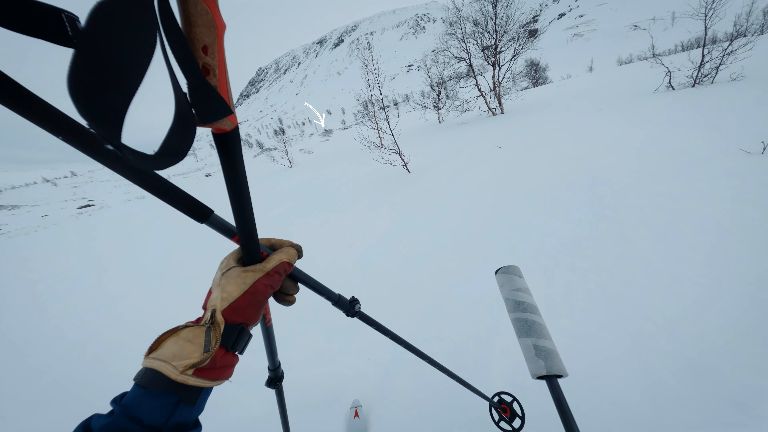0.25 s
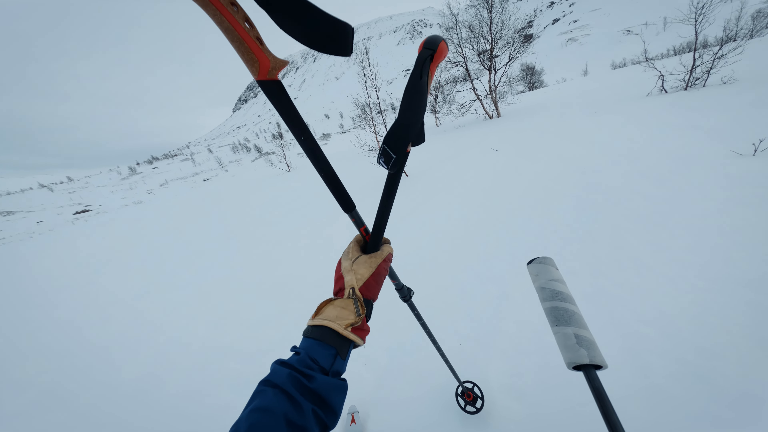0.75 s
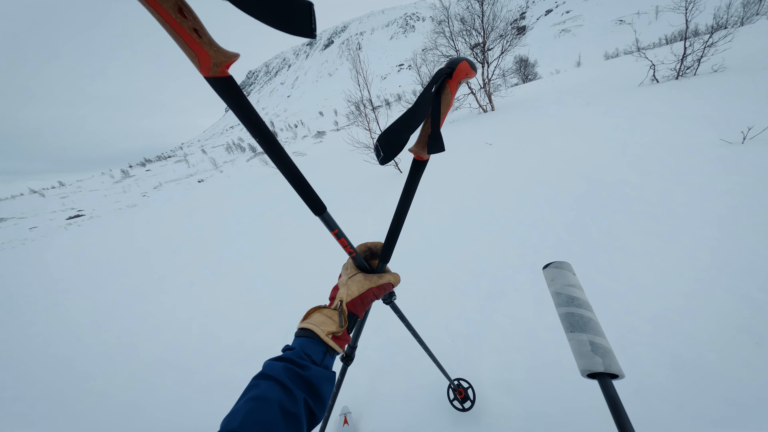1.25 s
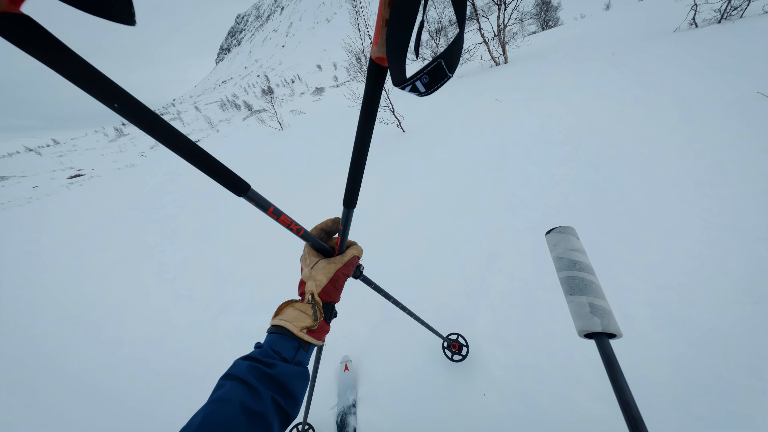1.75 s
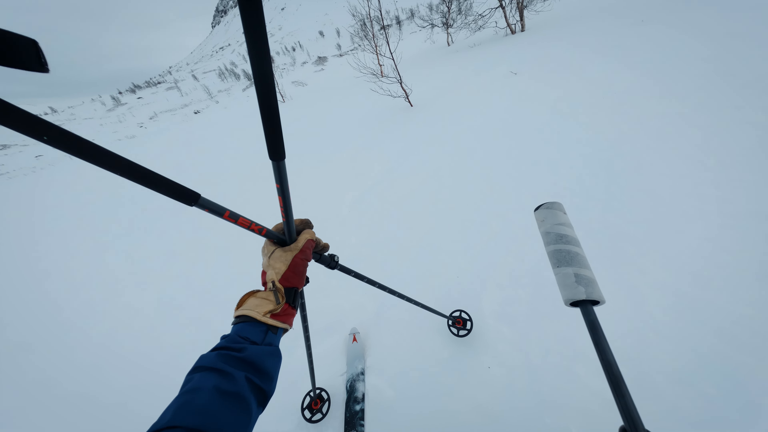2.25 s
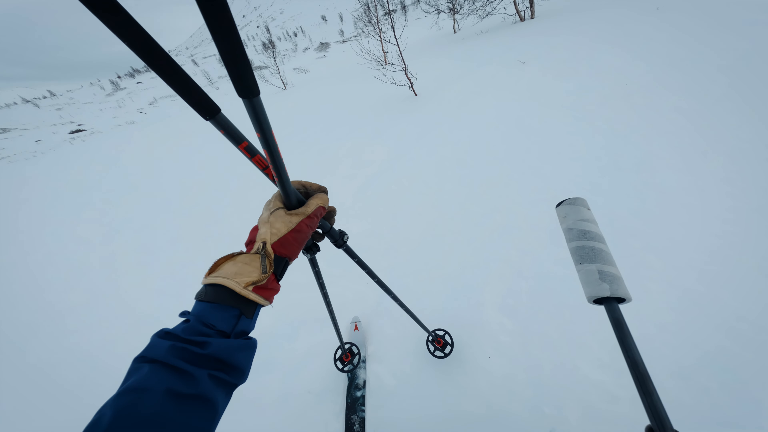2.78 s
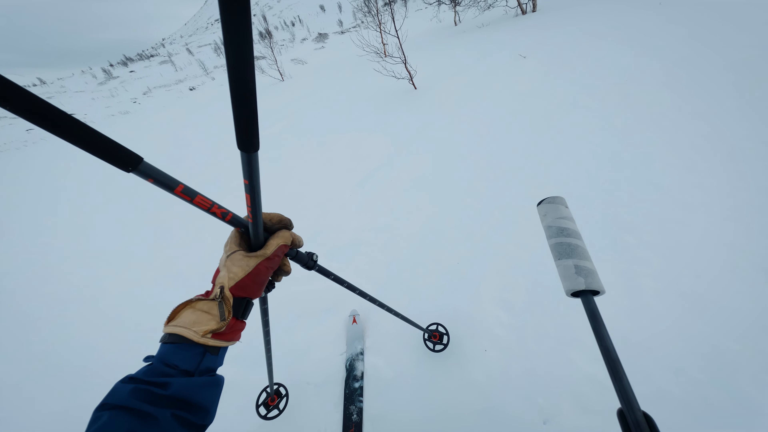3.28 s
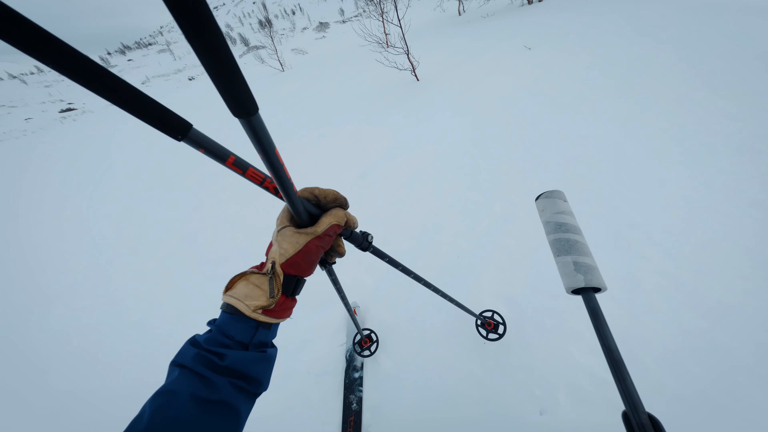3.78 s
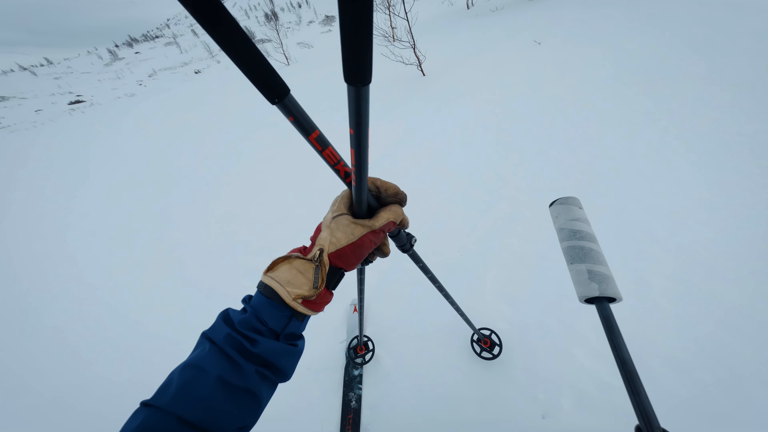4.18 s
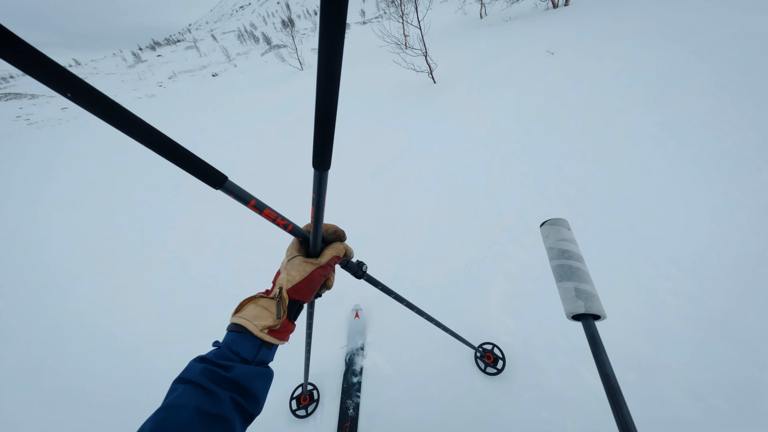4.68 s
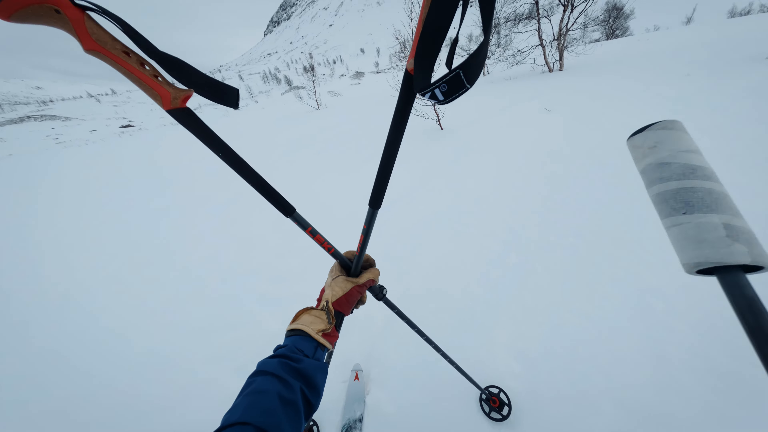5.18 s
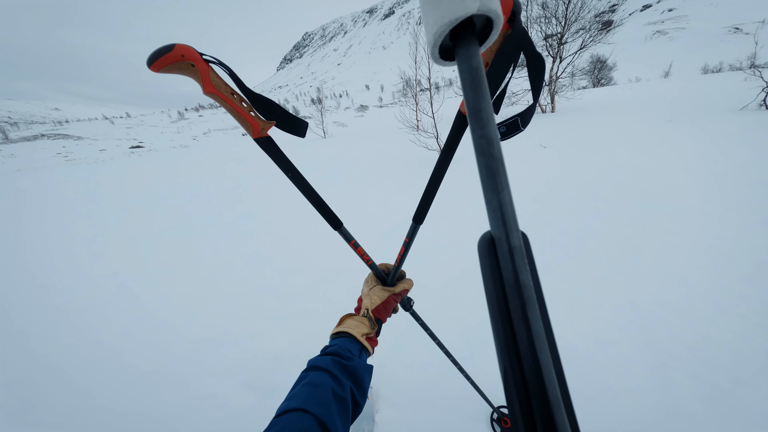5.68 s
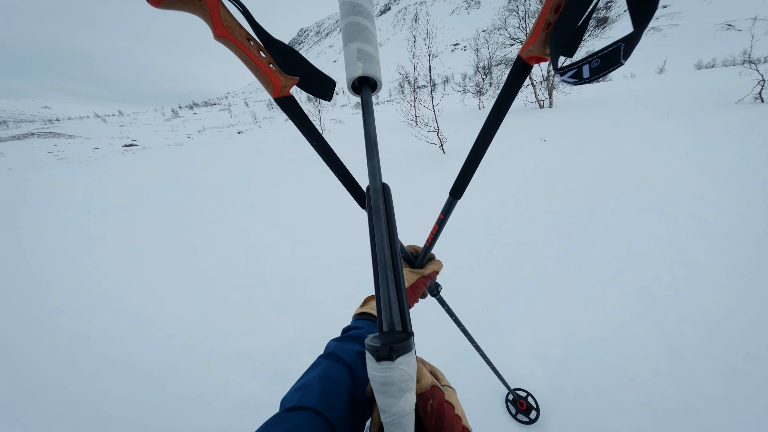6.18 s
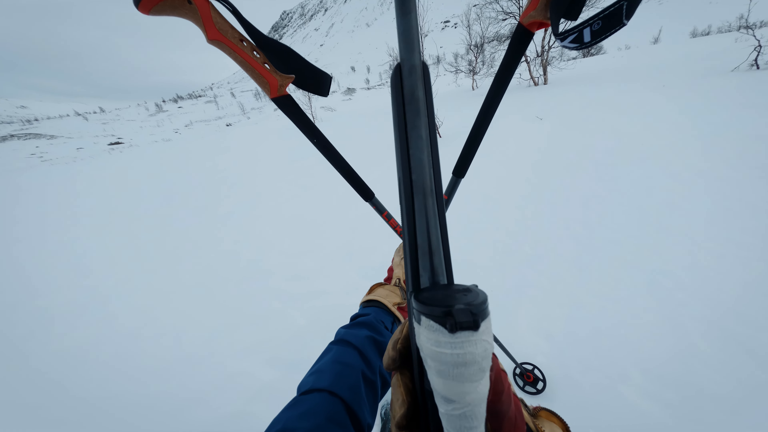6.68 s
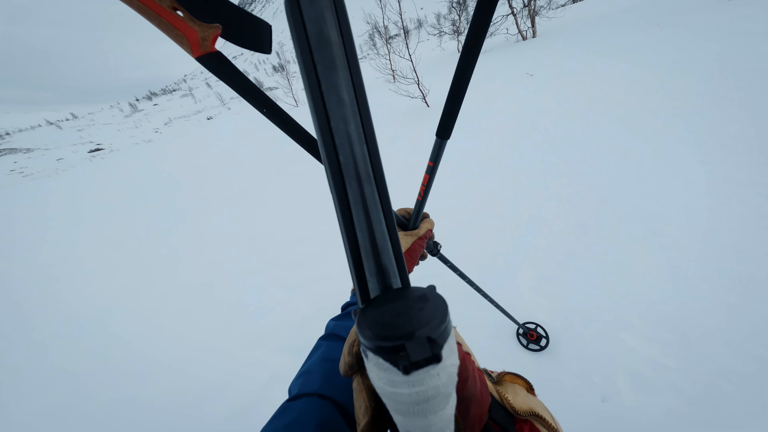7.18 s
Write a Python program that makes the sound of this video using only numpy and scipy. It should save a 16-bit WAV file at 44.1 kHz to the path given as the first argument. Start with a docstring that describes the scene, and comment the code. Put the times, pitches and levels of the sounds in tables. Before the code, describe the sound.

Open, echo-free snow, heard very close through a chest-worn stereo microphone. A short wind buffet opens, fading into low uneven rumble. At 0.2 s ski poles clack twice with brittle snaps; a louder, ringing clack lands at 0.7 s. Cloth rustles softly. Around 1.35 s a crack, a strap scrape and a short crunch, with soft pressure thumps to 1.55 s. From 1.95 to 2.6 s snaps crowd into gritty crunching runs. It quietens from about 3 s to 3.9 s, with only rustle and light wind. A strong crunch breaks at 4.0 s; scraping and crackling build from 4.45 s to a sharp pole clack and crunch at 4.77 s. Rustling swells at 5.2 s. From 5.5 to 6.3 s dull gear knocks, a brief creak and snaps cluster, with a hard tick at 6.03 s. Afterwards mostly faint cloth, tiny knocks, and a sudden crisp rustle at 7.3-7.4 s.

```python
"""Someone shifts about in hard crusted snow, handling ski poles close to chest-worn microphone ports.
From the start wind buffets (swinging low noise) and clothing rustles (clumpy noise, loose-snow ticks);
at 0.19 s poles clack (pushed resonances) and crust snaps (cracks with dying swarms), on to the end.
Gear knocks dully from 0.4 s (decaying tones), straps scrape from 1.33 s (noise through resonances),
crust gives way in runs from 1.34 s (dense cracks) and pressure thumps from 1.44 s (smooth pulses)."""
import sys
import numpy as np
from scipy import signal
from scipy.fft import rfft, irfft, next_fast_len
from scipy.io import wavfile
from scipy.ndimage import uniform_filter1d, map_coordinates

SR = 44100
rng = np.random.default_rng(int(sys.argv[2]) if len(sys.argv) > 2 else 0)


def wav_record(signal):
    """Record a signal, one row per channel, as 16-bit PCM in the file named by sys.argv[1]."""
    frames = np.transpose(np.atleast_2d(signal))
    bounded = np.clip(frames, -1, 1)
    # unit amplitude maps onto the largest positive 16-bit level
    quanta = np.round(bounded * 32767).astype(np.int16)
    wavfile.write(sys.argv[1], SR, quanta)


N = 327766
SIZE = next_fast_len(N + SR // 4)
HZ = np.fft.rfftfreq(SIZE, 1 / SR)

# colour of breaking crust: f/Hz, relative level/dB
CRUST_COLOUR = [(76, -60), (130, -3), (246, 1.5), (333, -2.5), (406, -1.5), (740, -4.5), (818, -2),
                (1350, -3.5), (1520, -2), (1860, -6.5), (5460, -9), (10200, -24), (13000, -40),
                (15400, -50)]
# colour of rubbed cloth: f/Hz, relative level/dB
CLOTH_COLOUR = [(65, -31), (110, 2.5), (257, 2.5), (440, 2), (509, -1), (1210, -1.5), (1490, -3.5),
                (1760, -3), (2450, -6.5), (3140, -7.5), (7650, -14.5), (12300, -28.5), (15400, -46)]
# pole tube resonances: f/Hz, width/Hz, gain re crust colour/dB
POLE_MODES = [(1252, 73, 3), (1713, 66, 8.5), (2270, 260, 4.5), (4280, 75, 7), (4500, 74, -9),
              (6440, 190, 8)]


def amp(db):
    """Gain of a level in dB."""
    return 10 ** (np.asarray(db) / 20)


def unit(x):
    """x at rms 1."""
    return x / np.sqrt(np.mean(x ** 2) + 1e-20)


def along(points, hz):
    """Interpolate (f/Hz, value) points on a log axis."""
    f, v = np.transpose(points)
    return np.interp(np.log(hz + 1), np.log(f + 1), v)


def curves(rows, outside=None):
    """One value per sample for each column after the time."""
    s, *cols = np.transpose(rows)
    return [np.interp(np.arange(N) / SR, s, c, outside, outside) for c in cols]


def wobble(knots_per_s):
    """A smooth random curve through random knots."""
    knots = rng.standard_normal(int(N * knots_per_s / SR) + 4)
    return map_coordinates(knots, [np.arange(N) * knots_per_s / SR])


def grainy(grain_db, rate, patchy_db, count=5):
    """Two unrelated noises sharing a fast, spiky loudness and patches of colour, count frames long."""
    z = signal.stft(rng.standard_normal((2, N)), nperseg=512)[2]
    field = uniform_filter1d(rng.standard_normal(z.shape[1:]), size=4, axis=0)
    field = uniform_filter1d(field, size=count, axis=1)
    pair = signal.istft(z * amp(patchy_db * unit(field)), nperseg=512)[1][:, :N]
    return unit(amp(grain_db * wobble(rate)) * pair)


def modes(table):
    """Causal response of a set of resonances, alternating in sign."""
    response = 0
    for k, (hz, width_hz, db) in enumerate(table):
        damping = 1j * HZ * width_hz
        response = response + (-1) ** k * amp(db) * damping / (hz * hz - HZ * HZ + damping)
    return response


def coloured(pair, gain):
    """Spectra of two noises coloured by gain, at unchanged level."""
    return rfft(pair, SIZE) * (gain / np.sqrt(np.mean(np.abs(gain) ** 2)))


def stereo(spectra):
    """Two unrelated spectra mixed to the likeness of the ports."""
    # left-right likeness: f/Hz, correlation
    likeness = [(30, 0.81), (100, 0.84), (300, 0.96), (2000, 0.86), (8000, 0.87), (13000, 0.51)]
    turn = np.arccos(np.clip(along(likeness, HZ), -1, 1)) / 2
    mid, side = spectra * [np.cos(turn), np.sin(turn)]
    return irfft(np.array([mid + side, mid - side]), SIZE)[:, :N]


def banded(pair, gain, body, bass, treble):
    """A coloured noise whose body, bass and treble follow their own envelopes."""
    low = 1 / (1 + (HZ / 980) ** 8)
    high = 1 - 1 / (1 + (HZ / 4000) ** 8)
    mid = np.clip(1 - low - high, 0, 1)
    bands = zip([body, bass, treble], [mid, low, high])
    return stereo(sum(coloured(pair * level, gain * share) for level, share in bands))


def wind():
    """Pressure swings on the ports: a deep rumble and a faster flutter above it, both lumpy noise."""
    # wind on the ports: t/s, rumble level/dB, flutter level/dB
    gusts = [(0.0, -35, -26), (0.1, -58.5, -55.5), (0.58, -51.5, -63.5), (0.89, -61.5, -61.5),
             (1.06, -40.5, -48), (1.32, -56, -63.5), (1.53, -43.5, -43.5), (1.68, -50.5, -61),
             (1.76, -33.5, -51), (1.88, -55, -55), (2.15, -46, -58), (2.52, -53.5, -70), (2.77, -44.5, -69),
             (2.9, -54.5, -91), (3.41, -49, -71.5), (3.6, -67, -71), (3.68, -43, -57), (3.77, -65, -72),
             (3.83, -41, -57.5), (4.22, -39, -61), (4.28, -45, -63), (4.35, -44, -51), (4.57, -39, -40),
             (4.7, -49, -76), (4.95, -59, -81), (5.13, -49.5, -65), (5.5, -55.5, -64), (6.25, -63, -69),
             (6.41, -52, -79), (6.5, -60.5, -63.5), (7.1, -50, -65), (7.43, -62, -56.5)]
    # colour of the wind: f/Hz, relative level/dB
    gust_colour = [(8.8, -21), (15, 7.5), (42, -2.5), (108, -21), (200, -18), (260, -38.5), (440, -120)]
    colour = amp(along(gust_colour, HZ))
    deep = 1 / (1 + (HZ / 60) ** 6)
    upper = (1 - deep) / (1 + (HZ / 115) ** 4)
    rumble, flutter = amp(curves(gusts))
    rumble = rumble * amp(5 * wobble(14)) * rng.standard_normal((2, N))
    flutter = flutter * amp(6 * wobble(28)) * rng.standard_normal((2, N))
    return stereo(coloured(rumble, colour * deep) + coloured(flutter, colour * upper))


def rustle():
    """Cloth folds creak in clumps over a soft hiss; each move swells and fades."""
    # clothing and loose snow: t/s, body level/dB, bass level/dB, treble level/dB
    bed = [(0, -56, -57, -69), (.37, -66, -81, -64.5), (.66, -57, -66.5, -61), (.84, -62, -59.5, -65.5),
           (1.22, -55.5, -62.5, -60.5), (1.58, -61.5, -76, -59.5), (1.81, -62, -67, -78),
           (2.36, -64, -64.5, -64), (2.77, -59.5, -62.5, -64.5), (3.25, -62, -65, -67.5),
           (3.55, -59.5, -74, -65), (3.58, -71.5, -87, -72), (3.752, -74, -90, -70.5),
           (3.76, -57, -63, -65), (3.85, -64, -73, -72), (3.96, -63, -69, -65), (4.57, -66, -70, -80),
           (4.94, -56.5, -63, -75), (5.45, -62, -64, -66.5), (6.56, -58.5, -64.5, -62.5),
           (6.66, -64, -72, -63), (6.97, -62, -66, -66.5), (7.325, -66, -67, -67.5),
           (7.372, -49.5, -53, -48.5), (7.43, -48.5, -60, -51)]
    # moves: peak t/s, 10 dB rise/s, 10 dB fall/s (both min 4 ms), body/dB, bass/dB, treble/dB
    moves = [(.24, 0, 0.02, -57, -51.5, -60.5), (.68, 0.1, 0.13, -62, -70, -59.5),
             (1.02, 0.14, 0.23, -57, -53.5, -63), (1.44, 0.24, 0.06, -72, -63, -59),
             (1.96, 0.1256, 0.11, -46, -52.5, -62), (2.212, 0.24, 0, -49.5, -72, -46),
             (2.5, 0.21, 0.2, -75.5, -56, -77), (2.66, 0.13, 0.1, -55.5, -56, -75),
             (2.836, -0.18, 0.01, -50, -54, -52), (3.19, .15, -0.04, -61, -76, -57),
             (3.432, 0.4, 0.13, -72, -62.5, -87), (3.815, 0.04, 0, -59, -57.5, -70),
             (4.092, 0.0443, 0.05, -49, -47.5, -61), (4.45, 0.11, 0.08, -52.5, -56, -57),
             (4.66, 0.01, 0.18, -51, -59, -45.5), (4.79, 0.04, 0.055, -38, -69, -42.5),
             (5.211, 0.2, 0.14, -44.5, -48.5, -47), (5.68, 0.15, 0.34, -57.5, -53, -60),
             (5.94, 0.17, 0.28, -45.5, -52, -50), (6.27, 0.24, 0.06, -51, -51, -55),
             (6.54, 0, 0.3, -56, -68.5, -61.5), (6.871, 0.04, 0.06, -50.5, -50.5, -76),
             (7.15, 0.14, 0.33, -54, -53, -64.5), (7.282, 0, 0, -45.5, -45, -50)]
    ticks_per_s, mean_tick_gain, tick_decay_s = 25, 0.61, 0.00079
    t = np.arange(N) / SR
    clumps = amp(1.65 * wobble(45))
    # loose grains of snow
    ticks = (rng.random(N) < ticks_per_s / SR) * rng.exponential(mean_tick_gain, size=N)
    clumps = clumps + signal.lfilter([1], [1, -np.exp(-1 / (tick_decay_s * SR))], ticks)
    power = amp(curves(bed)) ** 2
    for s, rise_s, fall_s, *db in moves:
        rise_s, fall_s = np.clip([rise_s, fall_s], 0.004, None)
        near = slice(max(round((s - 4 * rise_s) * SR), 0), round((s + 4 * fall_s) * SR))
        swell = amp(-10 * np.maximum((s - t[near]) / rise_s, (t[near] - s) / fall_s))
        power[:, near] += np.outer(amp(db), swell) ** 2
    noise = clumps * grainy(grain_db=1.5, rate=610, patchy_db=2.0)
    return banded(noise, amp(along(CLOTH_COLOUR, HZ)), *np.sqrt(power))


def clacks():
    """Poles clack together: a short push rings the tubes; the longer the contact, the duller."""
    # pole contacts: t/s, level/dB, contact time/ms
    contacts = [(0.1884, -5, .03), (0.2418, -1, 0.19), (0.7162, 7, 0.052), (4.7681, -1, .03)]
    pushes, t_ms = np.zeros((2, SIZE)), np.arange(SR // 200) / SR * 1000
    for s, db, contact_ms in contacts:
        push = np.exp(-t_ms / contact_ms)
        pushes[:, round(s * SR):][:, :len(t_ms)] = amp(db) * push / push.sum() * [[1], [.5]]
    return stereo(coloured(pushes, amp(along(CRUST_COLOUR, HZ)) * modes(POLE_MODES)))


def crunch():
    """Each snap is a hard crack, then a dying swarm of smaller ones; the treble dies first."""
    # crust snaps: t/s, level/dB, bass re body/dB, treble re body/dB, body t60/s
    snaps = [(0.189, -13.5, -6, 1.5, 0.03), (.217, -31, -13, -1, 0.041), (0.224, -28, 0, -3, 0.034),
             (0.2415, -25, -2, -24, 0.041), (0.2694, -38, -1, 0.5, 0.068), (.398, -37.5, -10, -0.5, 0.045),
             (0.7151, -12.5, -14.5, -3.5, 0.075), (1.046, -34, 1, -0.5, 0.041),
             (1.076, -29, -0.5, -4, 0.19), (1.2487, -35.5, -12, -2, .059), (1.2588, -29, -22.5, 0, 0.031),
             (1.3361, -16.5, -44, -7, 0.061), (1.353, -23, -27, -11, 0.047), (1.377, -28.5, -22, -5, 0.066),
             (1.554, -30.5, -2, -6.5, 0.093), (1.641, -41, -24, 6, 0.018), (1.753, -31.5, -8, -4, 0.03),
             (1.943, -27.5, -11.5, 1.5, 0.07), (1.9674, -19.5, -20, -19, .05), (1.9748, -21, -8, -17, 0.14),
             (1.995, -16, -11.5, -5, 0.057), (2.02, -22.5, -13, -8, 0.048), (2.244, -19, -33, -15, 0.036),
             (2.2717, -22, -13, 0, 0.084), (2.323, -33.5, -20, -3, 0.04), (2.369, -37, -27, -9, 0.07),
             (2.388, -29, -21, -7.5, 0.11), (2.4015, -23.5, -8.5, -7, 0.089),
             (2.4607, -21, -23, -4.5, 0.037), (2.527, -20, -27, 2, 0.032), (2.5504, -23, -3, -10, 0.076),
             (2.585, -16.5, -25, 1, 0.071), (2.949, -26.5, -16, -9.5, 0.032), (3.126, -36, -20, 3, 0.027),
             (3.7563, -28.5, -21, -7, 0.018), (3.9666, -21, -36, -6, 0.048), (3.9925, -11, -25, -2.5, 0.1),
             (4.008, -13, -15, -10, 0.091), (4.083, -26, -13, -15, 0.037),
             (4.1793, -28.5, -22.5, -4, 0.039), (4.2725, -29, -18, 4, 0.06), (4.41, -40.5, -2, 2.5, 0.088),
             (4.467, -20.5, -7.5, -23, 0.13), (4.669, -27, -27, -7, 0.041), (4.681, -37, -19, -10, 0.045),
             (4.698, -25.5, -23, 0.5, 0.057), (4.7682, -8, -15.5, -1.5, 0.045),
             (4.775, -14, -15, -12, 0.043), (4.842, -17, -29, 0, 0.039), (4.8726, -31, -29, -14, 0.028),
             (5.0311, -26.5, -8, -4, 0.032), (5.1249, -26.5, 3, -9, 0.047), (5.157, -28.5, -6, -1, 0.076),
             (5.206, -33, -21, -34, 0.043), (5.515, -36, 5, -20, 0.021), (5.5463, -28, -23, 0, 0.059),
             (5.641, -35.5, 7.5, -27, 0.052), (5.681, -36.5, 11.5, -30, 0.046),
             (5.7506, -21.5, -10, -4.5, 0.066), (5.7938, -18.5, 1.5, -8, 0.048),
             (5.8274, -16, -23, -4.5, 0.027), (5.845, -21, -34, -3, 0.16), (5.939, -24, 5, -24, 0.053),
             (5.9706, -29.5, 11, -21, 0.066), (6.0271, -23, -7, -23, 0.02),
             (6.0342, -11.5, -12, -15, 0.016), (6.1029, -27, 0, -13, 0.06), (6.2526, -24.5, 3, -38, 0.13),
             (6.51, -40, -5.5, -10, 0.019), (6.518, -30.5, -6, -25, 0.024), (6.684, -33, -35, -14, 0.017),
             (7.048, -37, 5.5, -25, 0.014), (7.371, -35, -13, 9, 0.03), (7.379, -35.5, 8, -6, 0.041),
             (7.394, -30, -20, 9, 0.012)]
    # where the crust breaks: t/s, left-right/dB
    sides = [(0, 1), (.7, -1.5), (1.9, -1.5), (2.25, 0), (2.56, -1.5), (3.0, 1.5), (4.1, -2), (5.2, -0.5),
             (6.0, -1.5), (6.035, 4), (6.1, -0.5), (7.43, -2)]
    left, right, t = np.zeros((3, N + SR)), np.zeros((3, N + SR)), np.arange(SR // 10) / SR
    swarm = unit(amp(2.16 * wobble(900)) * rng.standard_normal((2, N)))
    for s, db, bass_db, treble_db, t60_s in snaps:
        pan_db = np.interp(s, *np.transpose(sides))
        tail = amp(db - 12 - 60 * t / t60_s * [[1], [.9], [1.3]])
        burst = amp(db - 14.5 - 60 * t / 0.0056)
        shape = (tail + burst) * (1 - np.exp(-t / 0.00059))
        power = (amp([[0], [bass_db], [treble_db]]) * shape) ** 2
        left[:, round(s * SR):][:, :len(t)] += power * amp(pan_db)
        right[:, round(s * SR):][:, :len(t)] += power * amp(-pan_db)
        swarm[0, round((s + .0008) * SR)] = 3.0  # the leading crack
    level = np.sqrt((left + right)[:, :N] / 2)
    body_sides = np.array([left[0, :N], right[0, :N]])
    lean = np.sqrt(body_sides + 1e-12) / np.sqrt(level[0] ** 2 + 1e-12)
    snapping = banded(swarm, amp(along(CRUST_COLOUR, HZ)), *level)
    return snapping * uniform_filter1d(lean, size=64, axis=1)


def knocks():
    """A padded body rings briefly at its pitch, with a weaker, shorter overtone."""
    # knocks and short creaks of gear: t/s, relative level/dB, pitch/Hz, t60/s
    hits = [(0.4, -37, 232, 0.066), (1.072, -27.5, 266, 0.043), (1.336, -25, 1514, .04),
            (2.246, -22, 1486, 0.045), (2.286, -27, 1165, 0.049), (2.463, -41, 195, 0.38),
            (2.592, -31, 242, 0.083), (3.757, -49, 281.6, 0.33), (4.7, -46, 283, 0.37),
            (5.517, -27, 420, 0.024), (5.55, -22, 280, 0.041), (5.641, -23, 259, 0.034),
            (5.682, -23, 284, 0.033), (5.794, -23, 615, 0.036), (5.8, -38, 138, 0.18),
            (5.803, -24, 1049, 0.064), (5.937, -30.5, 770, 0.038), (5.945, -35, 1086, 0.05),
            (5.969, -26, 250, 0.05), (5.986, -35, 135, 0.11), (6.13, -34.5, 196, 0.047),
            (6.2527, -19, 1297, 0.018), (6.2527, -24, 538, 0.052), (6.2535, -22.5, 725, 0.05),
            (6.268, -39, 270, 0.035), (6.509, -37.5, 950, 0.04), (6.511, -41.5, 695, 0.042),
            (6.775, -44.5, 477, 0.024), (7.14, -39, 405, 0.053)]
    out, t = np.zeros(N + SR), np.arange(SR // 5) / SR
    for (s, db, hz, t60_s), phase in zip(hits, rng.uniform(0, 2 * np.pi, len(hits))):
        ring = amp(-60 * t / t60_s) * np.sin(2 * np.pi * hz * t)
        over = amp(-9.0 - 90 * t / t60_s) * np.sin(2 * np.pi * 1.9 * hz * t + phase)
        onset = 1 - np.exp(-t * hz * 2)
        out[round(s * SR):][:len(t)] += amp(db + 0.5) * (ring + over) * onset
    return out[:N]


def scrape():
    """Straps and a glove drawn over cloth and gear: friction noise excites a few resonances."""
    # one curve for each rubbed thing: t/s, level/dB
    strokes = [
        [(1.334, -67), (1.337, -25.5), (1.351, -41), (1.355, -32), (1.396, -49), (1.402, -75), (1.436, -70),
         (1.44, -43.5), (1.449, -60), (1.46, -52), (1.485, -66.5), (1.53, -58), (1.55, -39.5), (1.56, -73),
         (1.75, -77), (1.76, -53), (1.886, -61), (2.04, -46), (2.12, -44.5), (2.14, -75)],
        [(1.98, -58), (2.13, -41.5), (2.215, -52.5), (2.225, -64)],
        [(4.44, -69.5), (4.502, -33), (4.55, -44.5), (4.565, -58), (4.6, -54), (4.625, -40), (4.69, -48),
         (4.698, -39.5), (4.762, -35.5), (4.77, -29.5), (4.92, -47), (4.93, -76)],
        [(5.79, -57), (5.804, -29.5), (5.924, -64), (5.942, -32.5), (6.01, -58)],
    ]
    # resonances of each rubbed thing: f/Hz, width/Hz, relative gain/dB
    ribs = [
        [(3400, 310, -11), (6250, 400, -8), (7460, 1500, 0)],
        [(2570, 120, -2.5), (3220, 440, -7), (5270, 350, -12), (7900, 600, 1), (9400, 990, -3.5)],
        [(1146, 120, -9.5), (1640, 68, -9), (2250, 114, -4.5), (2970, 380, -8.5), (4060, 230, 1.5),
         (6420, 210, 2.5), (7700, 730, -9)],
        [(1060, 145, 0)],
    ]
    friction = grainy(grain_db=3.0, rate=700, patchy_db=3.5, count=14)
    cloth = amp(along(CLOTH_COLOUR, HZ))
    spectra = 0
    for rows, resonances in zip(strokes, ribs):
        level = amp(curves(rows, -120)[0])
        spectra = spectra + coloured(level * friction, cloth * modes(resonances))
    return stereo(spectra)


def rasp():
    """Crust gives way under weight: a dense run of cracks that ring the poles, then stops as it holds."""
    # runs: start/s, end/s, body level/dB, bass level/dB, treble level/dB, fall/dB
    runs = [(1.34, 1.404, -46.5, -44.5, -58, 9), (2.23, 2.291, -33.5, -46.5, -30, 4.5),
            (2.429, 2.448, -43.5, -43, -45, -3), (2.456, 2.465, -33.5, -45, -42.5, -3.5),
            (2.52, 2.561, -29.5, -41, -31.5, 2.5), (2.573, 2.613, -31.5, -32, -36, 8.5),
            (3.964, 4, -43, -65, -41.5, 5), (3.996, 4.07, -29, -39, -29, 14.5),
            (4.269, 4.298, -42.5, -47.5, -40.5, -2), (4.46, 4.557, -44, -53, -36, 12.5),
            (4.771, 4.92, -37, -38, -35, 13.5), (5.551, 5.577, -41, -50, -46.5, 3.5),
            (5.799, 5.884, -35, -34, -48, 15.5)]
    level = np.zeros((3, N))
    for start, end, body_db, bass_db, treble_db, fall_db in runs:
        t = np.arange(round((end - start + 0.0068) * SR)) / SR
        fades = np.clip(t / 0.0025, 0, 1) * np.clip((t[-1] - t) / 0.012, 0, 1)
        shape = amp(-fall_db * t / (end - start)) * fades
        level[:, round(start * SR):][:, :len(t)] += amp([[body_db], [bass_db], [treble_db]]) * shape
    cracks_per_s, crack_decay_s = 300, 0.0024
    chance, size = rng.random(N), rng.exponential(size=N)
    cracks = (chance < cracks_per_s / SR) * amp(3.7 * size)  # rare large ones among many small
    cracks = signal.lfilter([1], [1, -np.exp(-1 / (crack_decay_s * SR))], cracks)
    swarm = (0.45 + unit(cracks)) * grainy(grain_db=0.0, rate=100, patchy_db=3.5)
    return banded(unit(swarm), amp(along(CRUST_COLOUR, HZ)) * (1 + modes(POLE_MODES)), *level)


def thumps():
    """A brief one-sided pressure push between two shallow dips, a little stronger on the right."""
    # thumps on the ports: t/s, relative level/dB
    pushes = [(1.44, -33.5), (1.508, -31), (1.552, -31), (4.433, -32), (4.557, -32), (6.29, -44),
              (7.39, -40)]
    half_width_s = 0.0048
    t, out = np.arange(N) / SR, np.zeros(N)
    for s, db in pushes:
        v = ((t - s) / half_width_s) ** 2
        out += amp(db) * (np.exp(-v) - np.exp(-v / 10) / np.sqrt(10))
    return out * np.array([[.8], [1]])


def scene():
    """All sources in open, echo-free snow."""
    return wind() + rustle() + clacks() + crunch() + knocks() + scrape() + rasp() + thumps()


def record(dry):
    """The ports differ a little in colour; nothing from 15.6 kHz up is kept."""
    # colour difference of the ports: f/Hz, left-right/dB
    port_lean = [(60, -3.5), (180, -1.0), (550, 0.5), (1650, 0.5), (4970, 0.5), (15000, 3.5)]
    ports = amp(np.outer([.5, -.5], along(port_lean, HZ)))
    return irfft(rfft(dry, SIZE) * ports * (HZ < 15600), SIZE)[:, :N]


dry = scene()
out = record(dry)
wav_record(out)
```